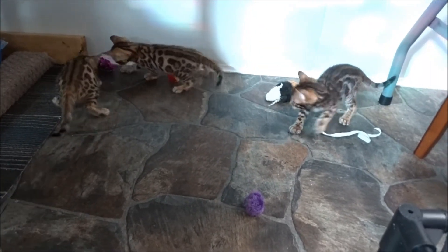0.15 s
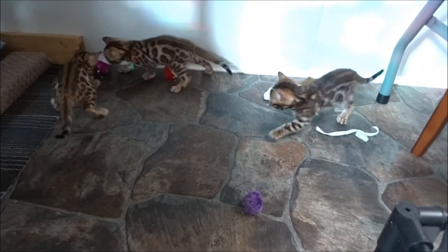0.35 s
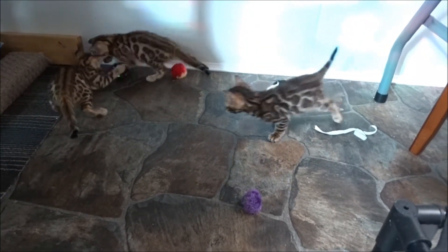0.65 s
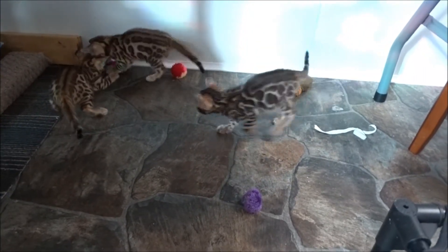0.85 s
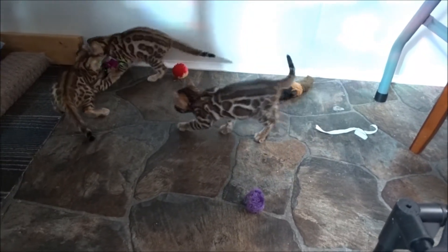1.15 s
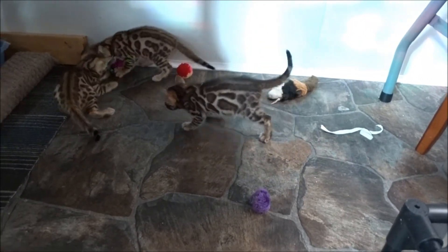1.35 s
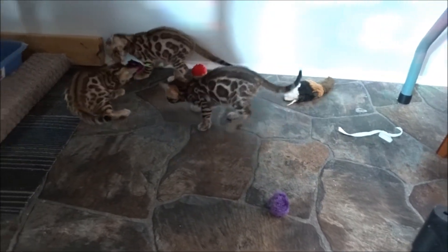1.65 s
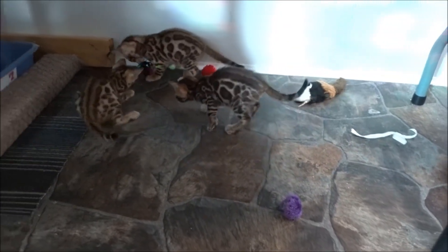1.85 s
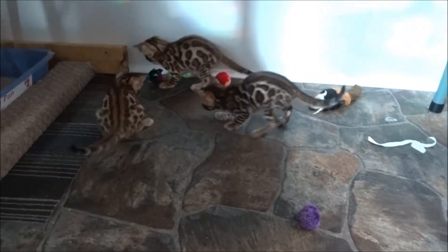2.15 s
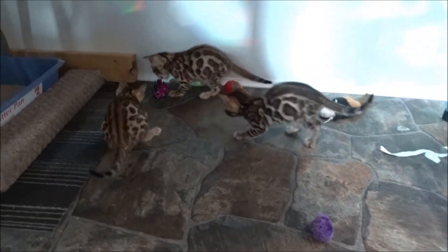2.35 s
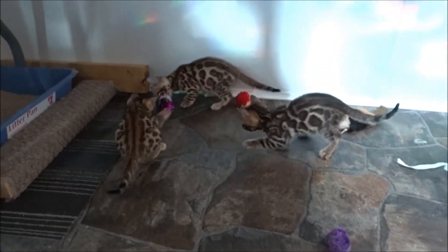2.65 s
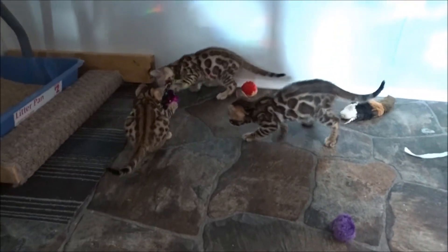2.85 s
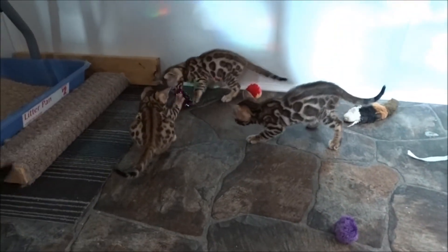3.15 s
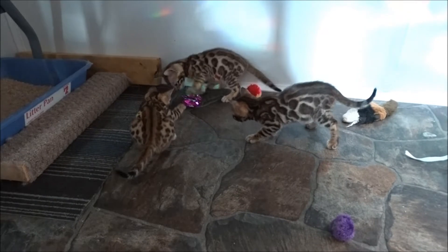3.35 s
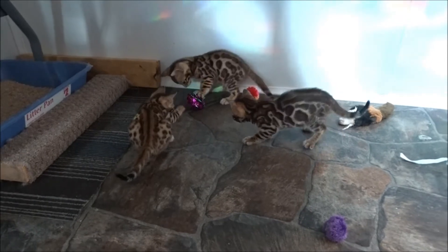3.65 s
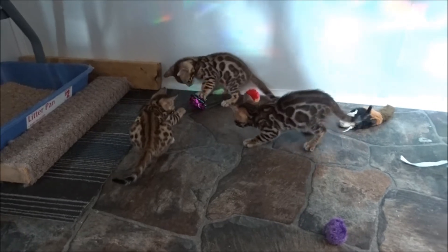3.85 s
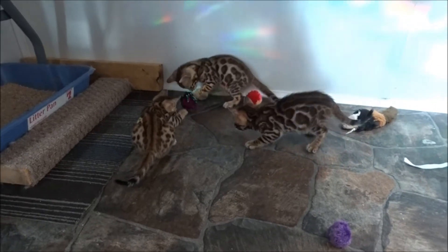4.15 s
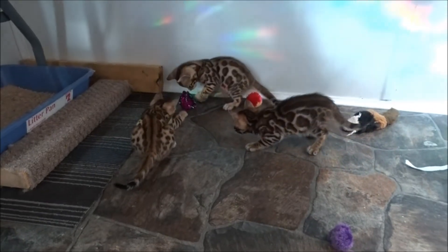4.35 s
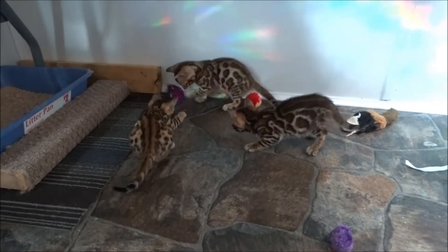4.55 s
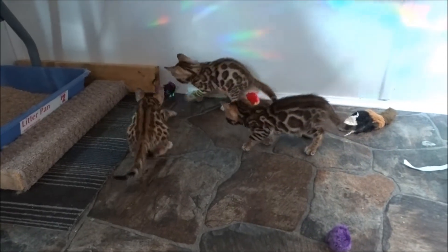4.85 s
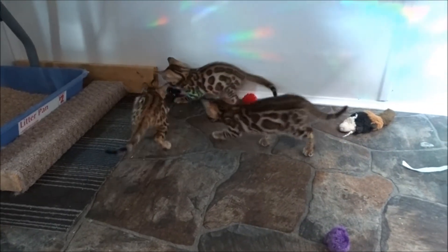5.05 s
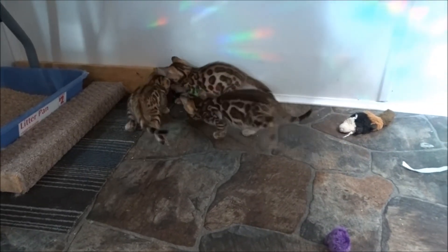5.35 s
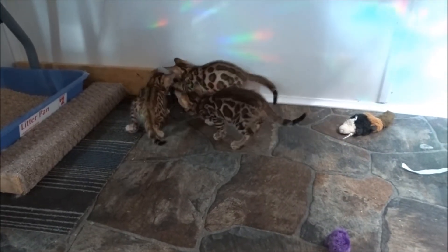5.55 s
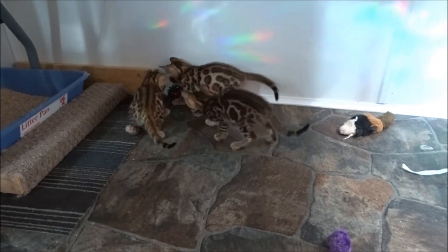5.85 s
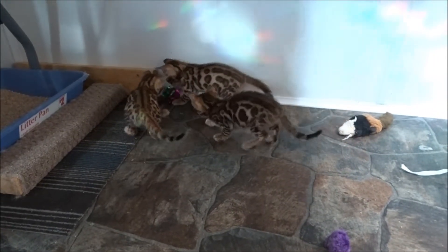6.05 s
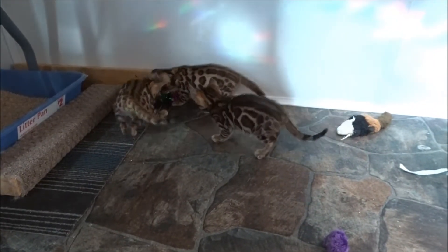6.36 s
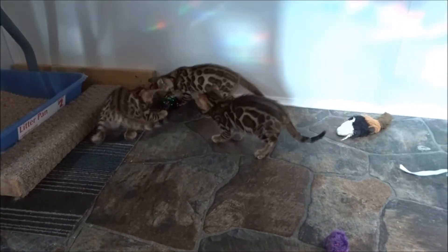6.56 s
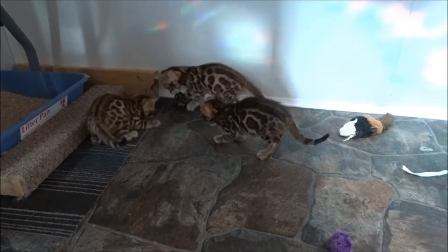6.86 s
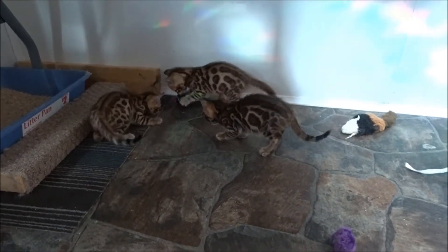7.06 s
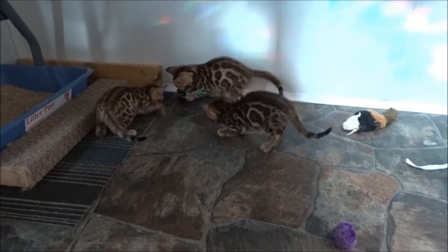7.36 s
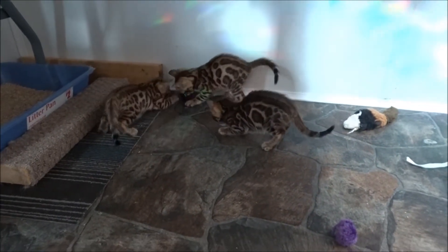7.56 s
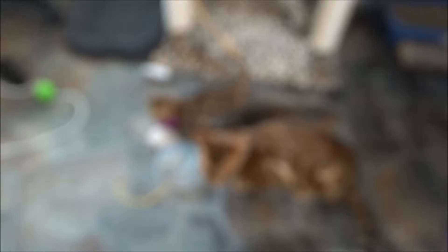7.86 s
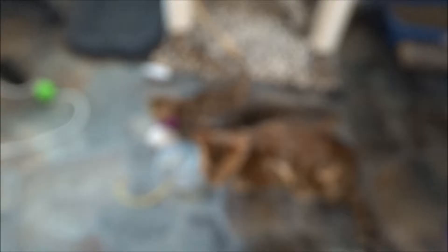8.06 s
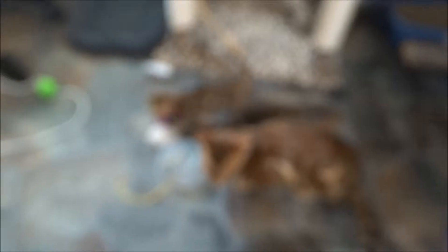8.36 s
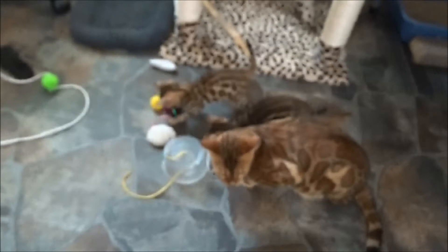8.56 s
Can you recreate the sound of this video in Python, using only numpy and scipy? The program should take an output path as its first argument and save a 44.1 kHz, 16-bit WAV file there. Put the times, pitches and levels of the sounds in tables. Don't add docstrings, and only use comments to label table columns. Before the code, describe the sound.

Crisp, papery metallic crinkling dominates, in irregular flurries with brief lulls, over steady fan air, mains hum and low building rumble. Soft hollow wood thumps come early, a stronger cluster midway, with a tiny rising mew right after. The stereo pickup is fairly near, with short hard-room reflections. The sound stops suddenly near the end, leaving silence before a barely audible return of the ball.

```python
import sys
import numpy as np
from scipy import signal
from scipy.fft import rfft, irfft, next_fast_len
from scipy.io import wavfile
from scipy.ndimage import uniform_filter1d, map_coordinates

SR = 44100
rng = np.random.default_rng(int(sys.argv[2]) if len(sys.argv) > 2 else 0)


def attenuation_scalar(level_db):
    decades = np.asarray(level_db, float) / 20
    return 10 ** decades


def digitize_waveform(pressure):
    field = np.atleast_2d(pressure).T
    bounded = np.clip(field, -1, 1)
    quanta = np.round(bounded * 32767).astype(np.int16)
    wavfile.write(sys.argv[1], SR, quanta)


N = 384111


def unit(x):
    return x / np.sqrt(np.mean(x ** 2) + 1e-20)


def hiss():
    return rng.standard_normal(N)


def along(points, hz):
    f, v = np.transpose(points)
    return np.interp(np.log(hz + 1), np.log(f + 1), v)


def curves(rows):
    s, *columns = np.transpose(rows)
    return [np.interp(np.arange(N) / SR, s, column) for column in columns]


def wobble(rate_hz):
    knots = rng.standard_normal(int(N * rate_hz / SR) + 4)
    return map_coordinates(knots, [np.arange(N) * rate_hz / SR])


def filtered(x, response):
    m = next_fast_len(x.shape[-1] + 8192)
    spectrum = rfft(x, m) * response(np.fft.rfftfreq(m, 1 / SR))
    return irfft(spectrum, m)[..., :x.shape[-1]]


def coloured(x, spectrum):
    return unit(filtered(x, lambda hz: attenuation_scalar(along(spectrum, hz))))


def stereo(mid, other, alike):
    def turn(hz):
        return np.arccos(np.clip(along(alike, hz), -1, 1)) / 2

    a = filtered(mid, lambda hz: np.cos(turn(hz)))
    b = filtered(other, lambda hz: np.sin(turn(hz)))
    return np.array([a + b, a - b])


# frequency in Hz, level in dB per Hz.
AIR_SPECTRUM = [(120, -10.5), (200, -1.5), (366, -2), (577, -0.5), (1040, -11), (1200, -4.5), (1640, -12.5),
                (3160, -13), (3800, -17), (5680, -26.5), (8490, -25), (9300, -28.5), (15800, -31)]
# frequency in Hz, left-right likeness 0-1.
AIR_LIKENESS = [(60, 0.66), (180, 0.64), (550, 0.79), (1650, 0.077), (4970, 0.54), (15000, 1)]
# time in seconds, level in dB.
FAN_LEVEL = [(0, -43), (2.3, -44.5), (3.25, -44.5), (4.53, -46), (5.7, -44.5), (6.4, -44.5), (7.0, -44),
             (7.9, -43.5), (8.4, -43)]
# frequency in Hz, level in dB per Hz.
RUMBLE_SPECTRUM = [(12, -43), (20, -19.5), (49, 3), (91, -6), (101, -4.5), (113, -1.5), (162, -4.5),
                   (182, -14), (250, -8.5), (320, -43.5), (550, -120)]
# frequency in Hz, level in dB rms, phase wander (factor).
HUM_LINES = [(119.3, -47.5, 0.16), (156, -54, .6), (364, -72, 0.39), (1210, -62.5, 0.92)]


def air():
    a, b, rumble = (coloured(hiss(), spectrum) for spectrum in (AIR_SPECTRUM, AIR_SPECTRUM, RUMBLE_SPECTRUM))
    t_s = np.arange(N) / SR
    hum = np.zeros(N)
    for hz, level_db, wander in HUM_LINES:
        level = attenuation_scalar(level_db + 2.0 + 0.77 * wobble(6))
        drift = wander * np.cumsum(wobble(30)) * 60 / SR
        hum += level * np.sin(2 * np.pi * hz * t_s + drift)
    draught = attenuation_scalar(curves(FAN_LEVEL)[0] + 1.1 * wobble(3.6)) * stereo(a, b, AIR_LIKENESS)
    rumble_db = -49.0 - 7 * (t_s > CUT_FADER[-1][0])
    return draught + attenuation_scalar(rumble_db) * rumble + hum


# frequency in Hz, t60 in seconds.
ROOM_DECAY = [(200, 0.29), (2000, 0.26), (8000, 0.072), (15000, 0.011)]


def room(x):
    out, hop, delay = np.zeros((2, N + SR)), SR // 3, 130
    for i in range(0, N, hop):
        hz, t_s, z = signal.stft(rng.standard_normal((2, SR // 2)), SR, nperseg=256)
        decay = attenuation_scalar(-60 * t_s / along(ROOM_DECAY, hz)[:, None])
        tail = signal.istft(z * decay, SR, nperseg=256)[1]
        wet = signal.fftconvolve(x[None, i:i + hop], tail / np.linalg.norm(tail[0]), axes=1)
        out[:, i + delay:i + delay + wet.shape[1]] += wet
    return out[:, :N]


# time in seconds, pitch in Hz, level in dB.
MEW_GLIDE = [
    (3.64, 596, -74),
    (3.67, 616, -45),
    (3.74, 690, -52),
    (3.78, 690, -48),
    (3.82, 610, -72),
]


def kitten():
    hz, level_db = curves(MEW_GLIDE)
    phase = 2 * np.pi * np.cumsum(hz * (1 + 0.011 * wobble(40))) / SR
    return attenuation_scalar(level_db - 1.0) * (np.sin(phase) + .15 * np.sin(2 * phase))


# frequency in Hz, level in dB, t60 in seconds.
SIDE_MODES = [(114, -11, 0.12), (187, -4.5, 0.61), (259, 3.5, 0.099), (368, -10, .25), (403, -15, 0.13),
              (665, -36.5, 0.46), (777, -31.5, 0.58)]
# frequency in Hz, level in dB, t60 in seconds.
TREAD_MODES = [(142.3, -3.5, 0.51), (435.5, -13, 0.22), (617.5, -30, 0.31), (694, -33, 0.12),
               (785, -34, 0.15), (900, -38.5, 0.34)]
# start in seconds, level in dB, share of the top 0-1, upper modes in dB,
# time free to ring in seconds.
STEP_BUMPS = [(0.289, -36, 0.26, -5, 0.088), (0.511, -51, 1, 10, 0.04), (.714, -33, 0.2, -8.5, .1),
              (2.236, -27.5, 0.3, -14, 0.065), (3.3, -8.5, 0.12, 3.5, 0.024), (3.313, -15, 0.3, -1, .014),
              (3.328, -12.5, 0.15, -1.5, 0.044), (3.378, -20, 0.03, -0.5, 0.049),
              (3.463, -16, 0.88, 21.5, 0.061), (3.474, 1.5, 1, -10, .04), (3.533, -4, 1, -10.5, 0.022),
              (3.571, -10, 1, -10, 0.026), (3.607, -20.5, 1, -8, .022)]


def step():
    rise_s, damping_s, thud_t60_s = 0.0022, 0.0095, 0.24
    thud_spectrum = [(20, -23.5), (45, 3.5), (90, -5.0), (300, -4), (700, -17.5), (1500, -64.0)]  # Hz, dB
    out, t_s = np.zeros(N + SR), np.arange(SR // 2) / SR

    def ring(modes, upper_db):
        total = np.zeros(len(t_s))
        for hz, mode_db, t60_s in modes:
            level_db = mode_db + upper_db * (hz > 320) - 60 * t_s / min(t60_s, .5)
            total += attenuation_scalar(level_db) * np.sin(2 * np.pi * hz * t_s)
        return total

    for start_s, level_db, top, upper_db, free_s in STEP_BUMPS:
        thud = attenuation_scalar(-18.0 - 60 * t_s / thud_t60_s) * coloured(rng.standard_normal(len(t_s)), thud_spectrum)
        body = top * ring(TREAD_MODES, upper_db) + (1 - top) * ring(SIDE_MODES, upper_db) + thud
        damping = np.exp(-np.maximum(t_s - free_s, 0) / damping_s)
        onset = 1 - np.exp(-t_s / rise_s)
        out[round(start_s * SR):][:len(t_s)] += attenuation_scalar(level_db) * onset * body * damping
    return out[:N]


# peak time in seconds, peak in dB, ring in Hz.
CREASE_SNAPS = [(0.1248, 4, 7600), (0.48, -5.5, 7900), (0.4845, -6, 9100), (0.5149, 1.5, 7700),
                (0.5247, 0, 6900), (0.7146, -8.5, 10700), (0.7278, -5, 7000), (1.6338, -2.5, 9600),
                (1.6528, -1.5, 7640), (1.8573, -5, 8700), (2.9887, -8.5, 7050), (2.9916, -6, 8500),
                (3.03, -12, 6600), (3.03, -10.5, 9000), (3.104, -10, 9300), (3.2127, -9.5, 7500),
                (3.2165, -5.5, 7850), (3.2206, -11.5, 8300), (3.268, -2.5, 9000), (3.2723, 0.5, 9400),
                (3.4457, -13, 9000), (3.4634, -8.5, 8100), (3.555, -7, 9040), (3.6537, -18, 5960),
                (3.8188, -9.5, 10960), (4.0204, -14.5, 6800), (4.0701, -6.5, 14000), (4.18, 0, 8300),
                (4.1844, -8, 9000), (4.233, -10.5, 2730), (4.2369, -9.5, 10600), (4.4819, -16, 7500),
                (4.6409, -8, 9500), (4.705, -8.5, 11200), (4.8094, -18.5, 7400), (4.8325, -4, 13900),
                (4.8349, -1, 8100), (5.1361, -4, 8870), (5.482, -10, 9900), (5.7235, -1.5, 8500),
                (5.756, -2, 7250), (5.7886, -4, 6650), (5.7935, -6, 8000), (6.4764, -15, 3400),
                (6.551, -8, 8000), (6.5717, -1, 8700), (6.6016, -2.5, 8800), (6.6447, -4, 13400),
                (6.661, -1, 8500), (6.7385, -5, 8150), (6.77, -11, 8800), (6.834, -4, 8700),
                (6.9173, -4, 8400), (7.388, -16.5, 11800), (7.514, -2.5, 15200), (7.7349, -9, 9000),
                (7.7502, -2.5, 8900), (7.8322, -8.5, 8800), (7.8788, -9.5, 8900), (7.8921, -5.5, 10140),
                (0.0829, -17, 9200), (0.6163, -22, 10000), (0.777, -6, 9600), (1.0368, -18.5, 13200),
               (1.4471, -11, 7900), (1.607, -12, 7700), (1.8862, -11, 7500), (1.9463, -19.5, 10100),
               (2.0754, -19.5, 7800), (2.1171, -22.5, 9600), (2.247, -30, 9000), (2.3114, -28, 12900),
               (2.5341, -13, 11200), (3.2014, -8.5, 7500), (3.8575, -15.5, 14300), (3.8888, -17, 9700),
               (4.1672, -10.5, 8400), (4.2161, -14, 7700), (4.4482, -27, 6200), (4.6583, -12.5, 5400),
               (5.2423, -14, 8400), (5.2543, -8, 8800), (5.3368, -16, 8500), (5.4994, -15, 2100),
               (5.5041, -15.5, 8600), (5.5298, -12, 8700), (5.5475, -16, 8700), (5.5516, -12, 9700),
               (6.5834, -3.5, 8800), (6.5975, -5, 8600), (6.6249, -7.5, 14700), (6.6293, -8, 8400),
               (6.6529, -9.5, 8400), (6.8016, -14, 7800), (6.8092, -12, 10100), (6.9026, -14.5, 10800),
               (7.307, -17.5, 8600), (7.3204, -17.5, 13100), (7.4111, -18, 7400), (7.4524, -12, 7800),
               (7.6496, -16, 10900), (7.6637, -17, 7800)]


def cracks():
    gain_db, rise_s, t60_s, noise, cycles = -3.5, 0.00077, 0.011, 0.34, 7.6
    peak_s, peak_db, hz = np.transpose(CREASE_SNAPS)[:, :, None]
    k = np.arange(-64, 320)
    t_s = k / SR
    shape = attenuation_scalar(peak_db + gain_db + np.where(t_s < 0, 20 * t_s / rise_s, -60 * t_s / t60_s))
    grit = rng.standard_normal((len(peak_s), len(k) + 1))
    grit = (grit - np.roll(grit, 2, axis=1))[:, 1:]
    ring = np.cos(2 * np.pi * hz * t_s) * np.exp(-np.abs(t_s) * hz / cycles)
    bursts = shape * (ring + noise * grit)
    places = np.round(peak_s * SR).astype(int) + k
    return np.bincount(places.ravel(), bursts.ravel(), N)


def creases(count, centre_hz, octaves, cycles, spread_db):
    u, z = rng.random((count, 3)), rng.standard_normal(count)
    hz = np.clip(centre_hz * 2 ** (octaves * z), 200, SR * .4)[:, None]
    k = np.arange(192)
    size = attenuation_scalar(-spread_db * np.log(u[:, 1:2] + 0.0012))
    decay = np.exp(-k * hz / (SR * cycles))
    rings = size * decay * np.sin(2 * np.pi * (hz * k / SR + u[:, 2:]))
    places = (u[:, :1] * N).astype(int) + k
    x = np.bincount(places.ravel(), rings.ravel(), N + 192)[:N]
    x = unit(filtered(x, lambda f: np.sqrt(f)))
    return x / np.sqrt(np.abs(uniform_filter1d(x ** 2, size=1500)) + 1e-3)


def turning(x, depth_db, hollows):
    hz, t_s, z = signal.stft(x, SR, nperseg=256)
    field = uniform_filter1d(rng.standard_normal(z.shape), size=4, axis=0)
    field = uniform_filter1d(field, size=24, axis=1)
    at = np.minimum(t_s * SR, N - 1).astype(int)
    lift_db = sum(peak_db * np.exp(-.5 * ((hz[:, None] - centre_hz[at]) / width_hz) ** 2)
                  for centre_hz, (peak_db, width_hz) in hollows)
    return unit(signal.istft(z * attenuation_scalar(depth_db * unit(field) + lift_db), nperseg=256)[1][:N])


def slips(per_s, spread_db, life_s):
    starts = (rng.random(N) < per_s / SR) * attenuation_scalar(spread_db * rng.standard_normal(N))
    power = 1 + signal.fftconvolve(starts, np.exp(-np.arange(1024) / (life_s * SR)))[:N]
    return np.abs(power) / power.mean()


# time in seconds, rustle in dB.
HANDLING = [(0, -41.5), (.55, -41.5), (.8, -27), (1.32, -42), (1.65, -35.5), (2.28, -54), (2.85, -27),
            (3.05, -39), (3.3, -32.5), (3.6, -59.5), (4.19, -25), (4.45, -58.5), (5.45, -34), (6.06, -57),
            (6.59, -22), (7.1, -47.5), (7.5, -41), (7.93, -27.5)]
# time in seconds, rustle in dB as heard.
HANDLING_NEXT = [(8.4, -74.5), (8.46, -74.5), (8.49, -61), (8.54, -72.5), (8.57, -61.5), (8.65, -66),
                 (8.675, -57.5), (8.71, -67.5)]
# peak time in seconds, level in dB rms, time to rise 20 dB in ms, t60 in seconds.
SLOW_SQUEEZES = [(.4417, -29.5, 47, 0.08), (.7895, -17, 60, 0.12), (.9364, -22, 50.5, 0.4),
                 (1.4018, -30, 48.5, 0.28), (1.5991, -24.5, 46.5, 0.5), (1.667, -14, 66.5, .15),
                 (2.544, -30, 79, 0.099), (2.6174, -28, 99.5, 0.2), (2.684, -24, 120.5, 0.18),
                 (2.868, -15.5, 60, 0.07), (2.967, -22, 54.5, 0.27), (3.5539, -27, 59.5, 0.27),
                 (3.8621, -31.5, 99.5, 0.05), (4.0634, -20.5, 76, 0.14), (4.655, -26.5, 41.5, 0.16),
                 (5.084, -26.5, 42.5, 0.027), (5.2575, -27.5, 94, 0.08), (5.6073, -24.5, 49.5, 0.27),
                 (5.727, -17.5, 23, 0.19), (6.177, -21, 60, 0.17), (6.309, -20.5, 83, .22),
                 (6.555, -21, 58.5, 0.26), (7.037, -33.5, 96, 0.27), (7.3194, -38, 39.5, 0.099),
                 (7.487, -19, 46.5, 0.032), (7.5692, -24.5, 57, 0.11), (7.751, -20, 80, 0.039)]
# peak time in seconds, level in dB rms, broad folds in dB re peak,
# t60 in seconds.
QUICK_BITES = [(0.099, -14.5, -4.5, 0.27), (.127, -11.5, -8, 0.06), (0.202, -25, -3.5, 0.057),
               (0.478, -14, -9.5, 0.13), (0.511, -15.5, -8.5, 0.2), (.522, -14.5, -2.5, 0.048),
               (1.483, -24.5, -9, 0.7), (1.5652, -25.5, -9, 0.043), (2.9885, -14.5, -9.5, .17),
               (.706, -29.5, -4.5, .1), (6.203, -27, -0.5, .1), (3.17, -32.5, -12.5, .15),
               (1.8056, -26, -5, 0.076), (3.03, -12, -6.5, .08), (3.2127, -12.5, -10, 0.18),
               (3.3052, -11, -6.5, 0.17), (3.4053, -33, 0, 0.093), (3.457, -15.5, -4.5, 0.16),
               (3.924, -28, -10, 0.034), (3.9573, -32, -1.5, 0.16), (5.044, -19, -9.5, 0.27),
               (5.4144, -27.5, -14, .055), (5.535, -23, -6, 0.049), (5.7797, -14, -5, 0.21),
               (6.1247, -27.5, -1, 0.19), (6.4771, -22, -1.5, 0.15), (6.509, -22, -2.5, 0.19),
               (6.915, -18.5, -5, 0.13), (7.191, -22, -6.5, 0.26), (7.219, -22, -5.5, 0.13),
               (7.4272, -25.5, -5.5, 0.22), (7.7653, -20, -7.5, 0.12)]
# time in seconds, level in dB rms,
# broad folds in dB re peak, t60 in seconds.
SWATS = [(0.236, -30.5, 3.5, 0.36), (0.345, -30, -2.5, 0.15), (0.5367, -16.5, -4.5, 0.12),
         (0.714, -18.5, -8.5, 0.19), (6.149, -22, -5.5, .2), (0.7265, -18, -15, 0.32),
         (1.856, -15.5, -7.5, 0.098), (1.884, -23, -6.5, 0.13), (1.9451, -39, 0, 0.21),
         (2.1184, -37.5, -2, 0.54), (2.294, -40.5, -7.5, 0.26), (2.55, -22.5, -8.5, 0.12),
         (3.677, -34.5, -6.5, 0.31), (3.99, -24.5, -5, 0.13), (4.3685, -37.5, -21, 0.061),
         (4.4799, -39.5, -9.5, 0.4), (4.6022, -16, -10, 0.2), (4.703, -21, -10, 0.14),
         (4.8302, -18.5, -5, 0.17), (4.9696, -39, -11, 0.39), (5.009, -26.5, -6, 0.62),
         (5.1247, -21, -7, 0.25), (5.3494, -20, -5, 0.18), (5.551, -26.5, -4, 0.39), (6.095, -34, -8, 0.3),
         (6.3892, -26.5, -4, 0.33), (6.571, -17.5, -11.5, 0.31), (6.599, -18, -18.5, 0.17),
         (6.6582, -18.5, -14, 0.21), (6.8455, -21.5, -12.5, 0.12), (7.389, -35, -5, 0.59),
         (7.5143, -21.5, -12, 0.069), (7.685, -21.5, -7.5, 0.086)]
# time in seconds, level in dB rms, broad folds in dB re peak.
LIGHT_PATS = [(1.0829, -23, -6.5), (1.095, -23, -1.5), (1.137, -30, 0), (1.282, -24.5, -4.5),
              (1.332, -35, -8.5), (1.3627, -28.5, -15.5), (1.5475, -20.5, -8.5), (2.41, -34.5, -9),
              (3.1006, -23, -8.5), (2.45, -34.5, -2), (2.502, -32, -4), (2.21, -38, -9), (4.656, -21, -9.5),
              (1.59, -22, -1.5), (7.0345, -29, -12), (7.3195, -29.5, -3), (7.648, -25, -3.5),
              (.921, -29, 6), (3.444, -19, -12.5), (3.5296, -20, -13), (3.6543, -30, -4.5),
              (3.704, -27, -9.5), (3.755, -30, -4), (4.233, -16, -8.5), (5.1324, -15, -7),
              (5.2864, -25.5, -9), (5.484, -25, -4.5), (5.626, -18.5, -5.5), (6.3506, -23, -3.5),
              (6.8112, -27, -19), (7.0757, -26, -9.5), (7.175, -25.5, -3.5), (7.306, -27, -6),
              (7.4956, -20, -17), (7.601, -23, -11), (7.8786, -22, -3)]
# peak time in seconds, level in dB rms, broad folds in dB re peak,
# t60 in seconds.
BUCKLES = [(1.165, -25.5, -2.5, 0.017), (1.182, -24, -7, 0.044), (1.202, -29, -7, 0.023),
           (1.2718, -32, -24, 0.016), (1.419, -20.5, -13, 0.015), (1.4473, -23.5, -10, 0.041),
           (1.46, -20, -11, 0.12), (2.075, -36, -4, 0.028), (2.581, -24, -14.5, 0.045),
           (2.7163, -20.5, -12, 0.023), (2.738, -23, -21, 0.031), (2.7525, -31.5, -14.5, 0.023),
           (3.2697, -12.5, -9, 0.2), (3.817, -24.5, -10, 0.017), (3.888, -31, -9, 0.026),
           (4.18, -18, -28, 0.1), (4.482, -24, -12.5, 0.023), (4.5853, -32.5, -3.5, 0.029),
           (4.64, -13.5, -27, 0.033), (4.808, -32.5, 1, 0.052), (5.337, -32.5, -21, 0.024),
           (5.7574, -10, -7, 0.086), (6.74, -18, -15, 0.028), (6.7683, -19, -9, 0.026),
           (6.8323, -14.5, -11.5, 0.019), (7.3592, -32.5, -7, 0.046), (7.732, -16, -7, 0.041),
           (7.833, -21.5, -26, 0.019), (7.8924, -14.5, -12.5, 0.014)]


def crunches():
    bite_rise_s, swat_rise_s, buckle_rise_s, pat_t60_s = 0.016, 0.0019, 0.0037, 0.062
    handling_folds_db, squeeze_folds_db, next_folds_db = -4.5, -4, -4
    crest_db = 2.5

    def folds_db(level_db, base_db):
        return base_db - 0.0242 * (level_db + 40.5)

    db, = curves(HANDLING + HANDLING_NEXT)
    this_scene = np.arange(N) < CUT_FADER[-1][0] * SR
    broad_db = np.where(this_scene, folds_db(db, handling_folds_db), next_folds_db)
    lead = SR // 10
    t_s = np.arange(-lead, SR // 4) / SR
    fine = np.pad(attenuation_scalar(2 * db), (lead, SR))
    broad = np.pad(attenuation_scalar(2 * (db + broad_db)), (lead, SR))

    events = [(s, d, folds_db(d, squeeze_folds_db), max(rise_ms, 30) * 0.00095, t60_s)
              for s, d, rise_ms, t60_s in SLOW_SQUEEZES]
    events += [(s, d, low_db, bite_rise_s, t60_s) for s, d, low_db, t60_s in QUICK_BITES]
    events += [(s, d, low_db, swat_rise_s, t60_s) for s, d, low_db, t60_s in SWATS]
    events += [(s, d, low_db, swat_rise_s, pat_t60_s) for s, d, low_db in LIGHT_PATS]
    events += [(s, d, low_db, buckle_rise_s, t60_s) for s, d, low_db, t60_s in BUCKLES]
    for s, peak_db, low_db, rise_s, t60_s in events:
        shape_db = np.where(t_s < 0, 20 * t_s / rise_s, -60 * t_s / t60_s)
        power = attenuation_scalar(2 * (peak_db + np.minimum(shape_db, crest_db)))
        fine[round(s * SR):][:len(t_s)] += power
        broad[round(s * SR):][:len(t_s)] += power * attenuation_scalar(2 * low_db)
    return fine[lead:lead + N], broad[lead:lead + N]


# frequency in Hz, level in dB per Hz.
FINE_SPECTRUM = [(2400, -34.5), (4000, -11), (6200, -6.5), (7100, -3), (7800, -4), (8450, -3), (9300, -1.5),
                 (12000, -8), (15000, -9), (17000, -15)]
# frequency in Hz, level in dB per Hz.
BROAD_SPECTRUM = [(650, -37.5), (1150, -5), (1700, -2.5), (2300, -2.5), (2700, -1), (3100, 0), (3600, 0.5),
                  (5000, -2), (6500, -25.5), (11000, -120)]
# frequency in Hz, level in dB per Hz.
SCUFF_SPECTRUM = [(210, -42), (350, -8.5), (665, -3), (751, -0.5), (1150, -8), (1300, -5.5), (1690, -5),
                  (2860, -120)]
# time in seconds, pocket in Hz, shell in Hz, crease in Hz.
BALL_HOLLOWS = [(0, 1700, 3960, 7800), (.46, 1630, 3300, 8000), (.55, 1490, 2600, 7500),
                (.78, 1950, 3150, 7600), (.92, 1740, 2920, 8020), (1.66, 2320, 3200, 7900),
                (2.55, 1990, 3050, 8000), (2.87, 1953, 2724, 8000), (3.04, 2220, 2800, 7600),
                (3.3, 1590, 4140, 8400), (4.05, 1750, 2770, 8000), (4.62, 1700, 2520, 8600),
                (4.85, 2068, 3200, 8000), (5.75, 2100, 3200, 8120), (6.2, 1680, 3140, 8500),
                (6.5, 1400, 3180, 8500), (6.92, 1440, 2760, 8300), (7.9, 1693, 3390, 8500)]
# time in seconds, pocket in Hz, shell in Hz, crease in Hz.
BALL_HOLLOWS_NEXT = [(8.38, 1900, 2110, 8690), (8.71, 1962, 2300, 8520)]


def rustle():
    pocket_lift, shell_lift, crease_lift = (3.7, 220), (3.3, 160), (2.1, 380)
    paws_db, paws_grow, paws_span_s = -15, .4, 0.23
    fine_power, broad_power = crunches() * slips(per_s=110, spread_db=6, life_s=0.0014)
    pocket_hz, shell_hz, crease_hz = curves(BALL_HOLLOWS + BALL_HOLLOWS_NEXT)

    fine = creases(count=24000, centre_hz=8480, octaves=.6, cycles=8.4, spread_db=2.0) + 1.8 * hiss()
    pops = creases(count=1200, centre_hz=6060, octaves=0.82, cycles=1.0, spread_db=7.0)
    fine = coloured(fine + 0.16 * pops, FINE_SPECTRUM)
    fine = turning(fine, depth_db=1.65, hollows=[(crease_hz, crease_lift)])

    broad = creases(count=9000, centre_hz=2710, octaves=0.608, cycles=9.8, spread_db=1.0) + 1.3 * hiss()
    broad = coloured(broad, BROAD_SPECTRUM)
    broad = turning(broad, depth_db=.9, hollows=[(pocket_hz, pocket_lift), (shell_hz, shell_lift)])
    foil = attenuation_scalar(0.05) * np.sqrt(fine_power) * fine + attenuation_scalar(-1.13) * np.sqrt(broad_power) * broad

    play_power = np.abs(uniform_filter1d(broad_power, size=round(paws_span_s * SR)))
    busy_db = 10 * np.log10(play_power + 1e-5) + 32
    paws_level = attenuation_scalar(paws_db + paws_grow * busy_db + 1.3 * wobble(25)) * np.sqrt(broad_power)
    paws = paws_level * coloured(hiss(), SCUFF_SPECTRUM)

    next_scene = np.arange(N) > 8.2 * SR
    fader_db = next_scene * np.maximum(curves(CUT_FADER + FADE_IN_FADER)[0], -44)
    return (foil + paws) * attenuation_scalar(-fader_db)


# frequency in Hz, left-right likeness 0-1.
BALL_LIKENESS = [(60, 1), (300, 1), (550, 0.66), (1100, 0.92), (2400, 0.97), (5000, 0.98), (7500, 1),
                 (10000, 0.37), (15000, 0.53)]


def scene():
    ball, bumps = rustle() + cracks() + kitten(), step()
    echo = room(ball + attenuation_scalar(-4.5) * bumps)
    heard = stereo(ball + attenuation_scalar(-11.5) * echo[0], attenuation_scalar(-3.5) * echo[1], BALL_LIKENESS)
    return heard * attenuation_scalar([[.2], [-.2]]) + bumps * attenuation_scalar([[.4], [-.4]]) + air()


def band_limit(x):
    return signal.sosfilt(signal.butter(12, 17010, fs=SR, output="sos"), x)


# time in seconds, level in dB.
CUT_FADER = [
    (0, 0),
    (7.926, 0.5),
    (7.928, -18),
    (7.94, -40),
    (7.97, -33),
    (7.992, -49),
    (7.995, -120),
]
# time in seconds, level in dB.
FADE_IN_FADER = [
    (8.355, -120),
    (8.365, -78),
    (8.402, -55),
    (8.46, -32),
    (8.71, -27),
]


def record(dry):
    x = dry / (1 + np.abs(dry / .99) ** 8) ** (1 / 8)
    x = filtered(x, lambda hz: hz < 15950)
    x = x * attenuation_scalar(curves(CUT_FADER + FADE_IN_FADER)[0])
    return band_limit(x)


dry = scene()
out = record(dry)
digitize_waveform(out)
```